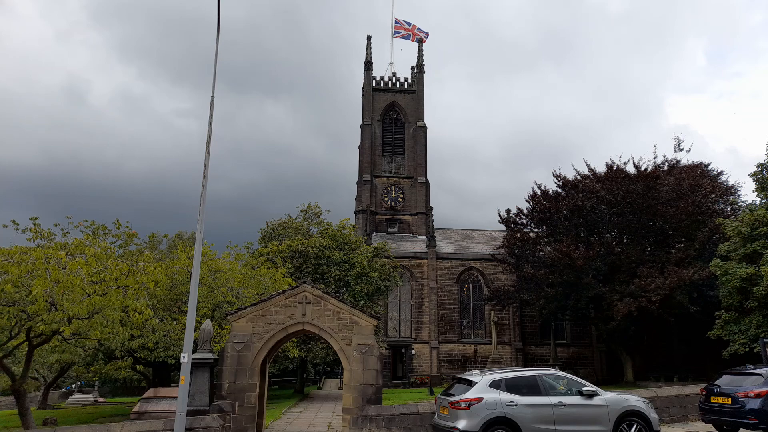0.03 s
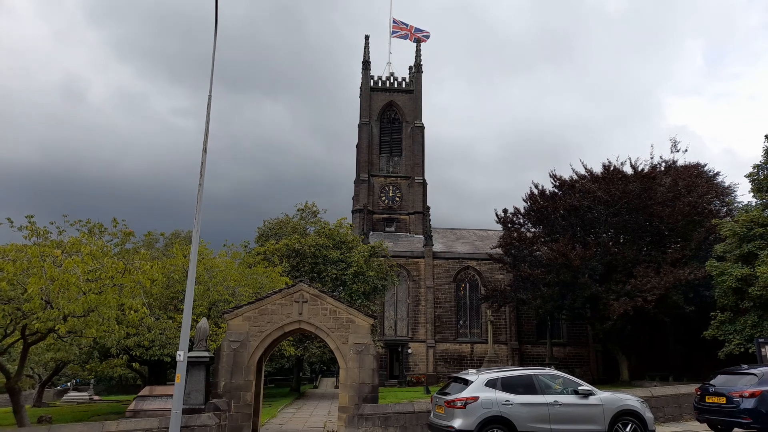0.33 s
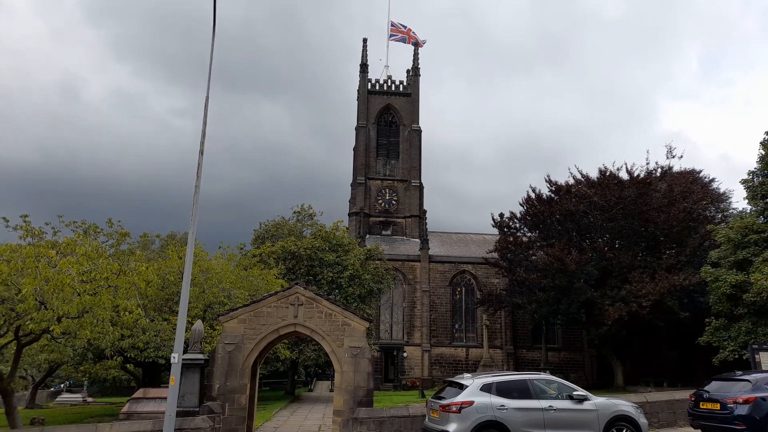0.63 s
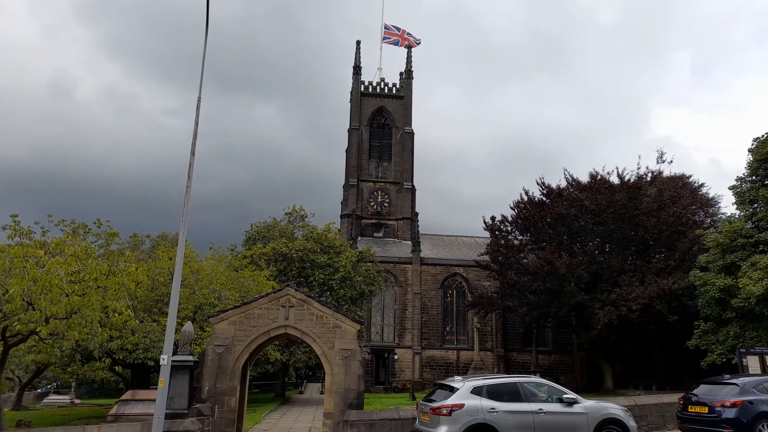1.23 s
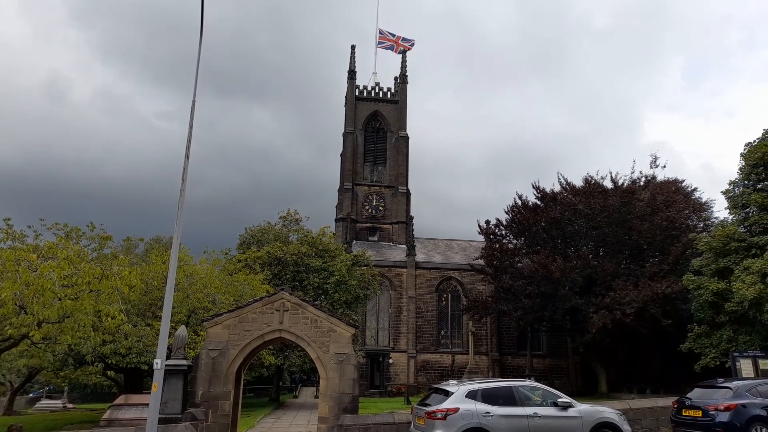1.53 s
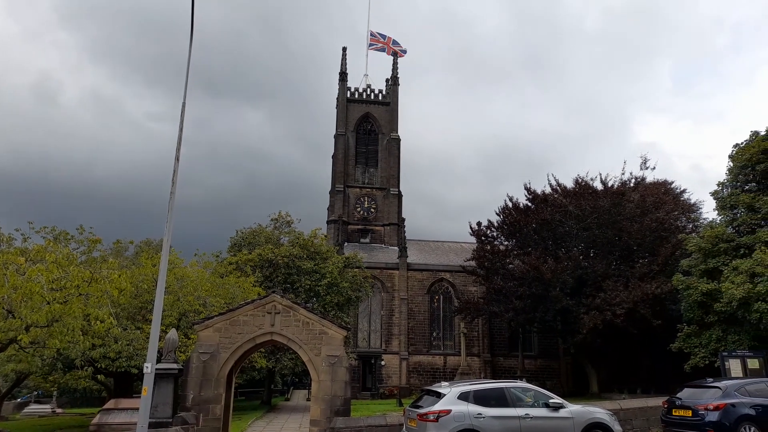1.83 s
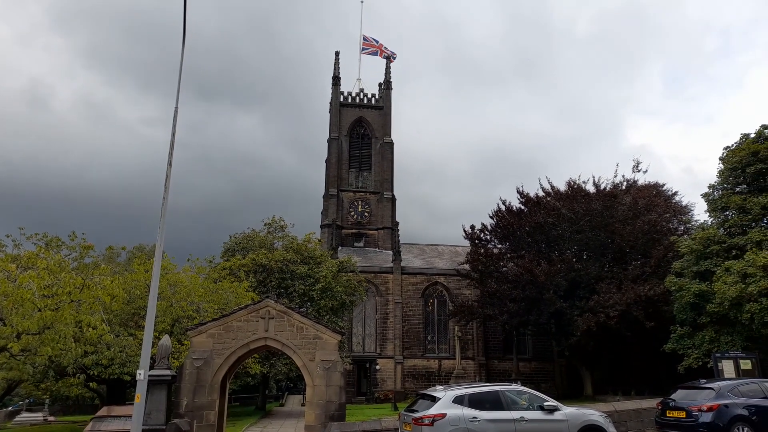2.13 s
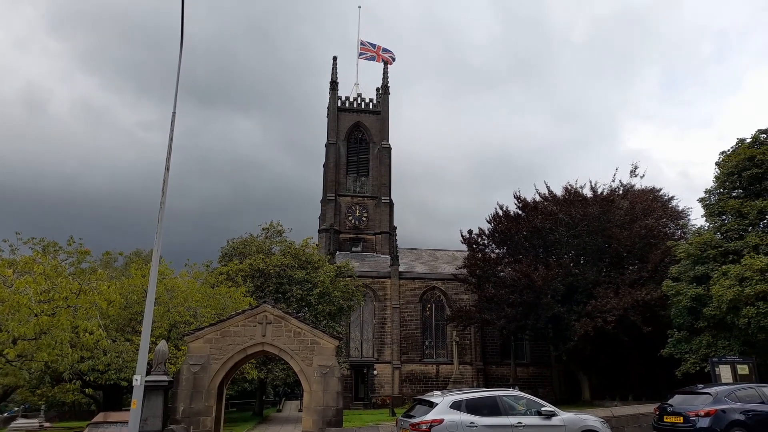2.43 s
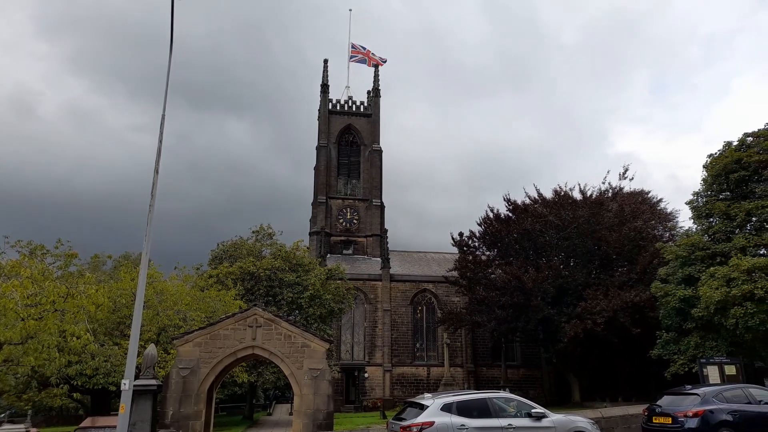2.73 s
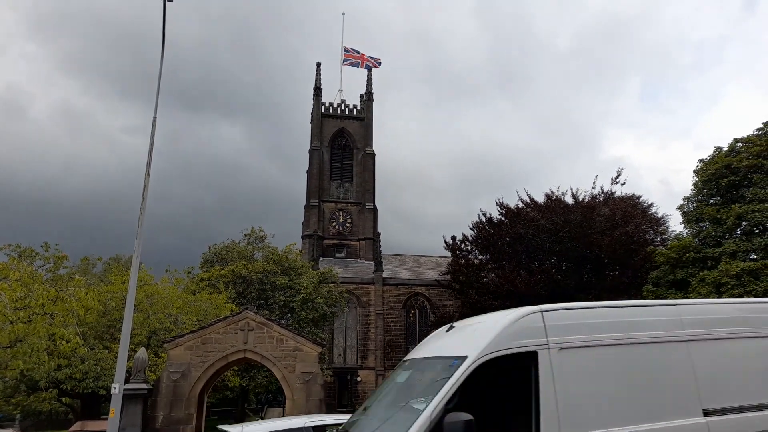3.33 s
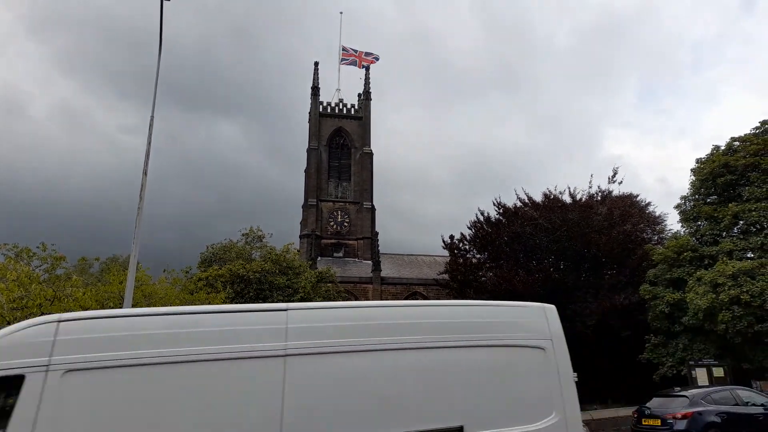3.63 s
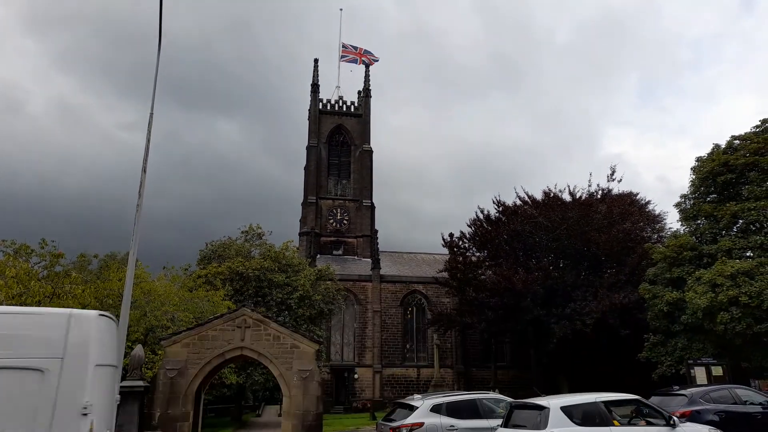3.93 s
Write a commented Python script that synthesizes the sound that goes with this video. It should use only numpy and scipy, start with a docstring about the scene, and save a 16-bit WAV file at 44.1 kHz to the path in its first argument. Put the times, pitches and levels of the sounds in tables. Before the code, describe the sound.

A diesel van passes close by, engine droning and tyres roaring, with distant town traffic behind.

```python
"""A diesel van drives past

The van goes from right to left, a few metres from a phone on the pavement of a town street.
Its engine drones and hisses, its tyres sing, and the front and rear axles roar by in turn.
Behind it are traffic up and down the road and one faint squeak. Wind buffets the phone's
two microphone openings (ports) separately."""
import sys
import numpy as np
from scipy import signal
from scipy.fft import rfft, irfft
from scipy.io import wavfile
from scipy.ndimage import uniform_filter1d, map_coordinates

SR = 44100
rng = np.random.default_rng(int(sys.argv[2]) if len(sys.argv) > 2 else 0)


def waveform_to_disk(signal):
    """Save audio, clipped to [-1, 1], as 16-bit WAV at the path in sys.argv[1]."""
    frames = np.transpose(np.atleast_2d(signal))
    scaled = np.clip(frames, -1, 1) * 32767
    samples = np.round(scaled).astype(np.int16)
    wavfile.write(sys.argv[1], SR, samples)


N = 176400

SPEED_M_S, LANE_M, SOUND_M_S = 8.2, 4.8, 343  # van speed, its closest distance, speed of sound
FRONT_S, REAR_S = 3.42, 3.8  # when each axle passes the phone
PORT_LAG_S = .00051  # time sound takes from one port to the other

# engine tones (multiple of the crankshaft's turning rate, level/dB)
ENGINE_TONES = [(2, -13.5), (3, -21), (4, -19), (6, -1.5), (7, -13), (8, -21.5), (9, -14), (12, -16.5)]
# loudness of the exhaust drone (t/s, level/dB)
DRONE_LOUDNESS = [(0, -26.5), (1.4, -12.5), (2.35, -15), (2.6, -5.5), (2.82, -5.5), (2.89, 1), (3.03, 3.5),
                  (3.3, -.7), (3.55, -2.7), (4, -10)]
# hiss from the front of the van (f/Hz, level/dB)
HISS_SPECTRUM = [(300, -14), (900, 10), (2000, 4.5), (3000, -2), (4500, -4), (7000, -7.5), (10000, -5),
                 (13300, -3.3), (15700, -8)]
# loudness of that hiss (t/s, level/dB)
HISS_LOUDNESS = [(0, -68), (1.85, -59.5), (2.05, -54.5), (2.35, -50.5), (2.66, -51.3), (2.82, -43.5),
                 (3.03, -39.3), (3.25, -38.2), (3.44, -37.7), (3.69, -39.7), (3.77, -44.5), (4, -51)]
# roar of the front tyres (f/Hz, level/dB)
FRONT_SPECTRUM = [(40, -10), (120, -1.5), (280, 4.8), (420, -10), (520, -12), (580, -5.5), (780, -2),
                  (1050, -8.5), (1270, -13), (1800, -18.5), (2800, -17.5), (7000, -40), (15000, -68)]
# roar of the rear tyres (f/Hz, level/dB)
REAR_SPECTRUM = [(40, -19), (110, -5), (245, 7.3), (380, -12), (600, -12), (850, .3), (1050, 0),
                 (1300, -10.5), (1850, -15), (2800, -39.5), (7000, -32), (10000, -25), (15000, -29)]
# narrow tread tones and broad tyre whooshes (f/Hz, width/Hz, level/dB, loudest at t/s, length/s)
TREAD_BANDS = [(505, 30, -40, 3.55, .48), (780, 70, -34.5, 3.95, .19), (762, 70, -35, 3.52, .13),
               (884, 40, -34.5, 3.64, .1), (870, 60, -36.5, 3.93, .22), (1450, 1200, -39.5, 3.02, .17),
               (1700, 700, -33.7, 3.42, .19), (1650, 480, -36.3, 3.77, .12)]
# distant traffic (f/Hz, level/dB)
TRAFFIC_SPECTRUM = [(25, -37), (55, -4.5), (150, -.8), (210, -1.3), (290, -3), (400, -4.5), (540, -5),
                    (680, -6.5), (850, -5.4), (1200, -7.4), (1750, -10.3), (2200, -16.5), (2800, -24),
                    (4300, -27), (7000, -44.5), (15000, -62)]
# loudness of that traffic (t/s, level/dB)
TRAFFIC_LOUDNESS = [(.14, -5), (.55, -2), (1.3, .5), (2.1, 1), (2.7, 2.5), (4, 4.5)]
# low rumble of the town (f/Hz, level/dB)
RUMBLE_SPECTRUM = [(20, -46), (36, -8), (54, 15), (72, 10.5), (110, -9), (250, -27)]
# thin swish on the left (f/Hz, level/dB)
SWISH_SPECTRUM = [(1500, -2.5), (4000, -1.7), (7000, -8.5), (8700, -4), (10000, -3), (13500, 3),
                  (14500, -1), (15200, -24)]
# loudness of that swish (t/s, level/dB)
SWISH_LOUDNESS = [(.14, -64), (.6, -57), (1.5, -54), (2.1, -47), (2.6, -53), (4, -59)]
# a gust hitting a port (f/Hz, level/dB)
GUST_SPECTRUM = [(20, -34), (45, -11), (70, -3), (135, 8), (200, -2.5), (290, -6.5), (370, -30.5),
                 (800, -41), (2500, -77)]
# the gusts (t/s, length/s, level/dB, port: 0 left or 1 right)
WIND_GUSTS = [(.29, .07, -32, 1), (.368, .04, -19, 1), (.47, .19, -25, 1), (.72, .15, -26, 1),
              (.79, .035, -20, 1), (.832, .035, -15, 1), (.91, .06, -21, 1), (1.148, .053, -24.5, 1),
              (1.585, .03, -22.5, 1), (2.377, .045, -25, 1), (2.89, .07, -23, 1), (3.476, .06, -18.5, 1),
              (3.775, .1, -24, 1), (.844, .13, -34, 0), (1.364, .1, -32, 0), (1.714, .06, -28, 0),
              (2.016, .056, -31, 0), (2.303, .12, -29.5, 0), (3.18, .06, -24.5, 0), (3.98, .07, -25, 0)]
# breeze blowing over a port (f/Hz, level/dB)
BREEZE_SPECTRUM = [(20, -24), (33, -14), (46, -1.5), (70, -0.5), (120, -0.5), (200, -18.5), (330, -24),
                   (1000, -57)]
# loudness of that breeze (t/s, level/dB)
BREEZE_LOUDNESS = [(.14, -39.5), (1, -38), (2.2, -37), (3.1, -37), (4, -35)]
# how the left port boosts or cuts each frequency (f/Hz, level/dB)
LEFT_COLOUR = [(300, 0.5), (600, 2.5), (1100, -1), (1700, -1.8), (2300, -3), (2900, -0.5), (6000, -1),
               (7400, -2), (8500, -4.5), (9800, -4), (15000, -8)]
# the same for the right port (f/Hz, level/dB)
RIGHT_COLOUR = [(300, 0.5), (600, 1.8), (1100, -.6), (1700, 2.6), (2300, 1.2), (2900, -2), (6000, 0),
                (7400, 0.5), (8500, -10.3), (9800, -1.2), (15000, -16.5)]


def engine(crank_hz=25.97, wander=.00399, drone_db=-28.5, hiss_pulse=.28, echo_db=4.5):
    """The exhaust drones at multiples of the crankshaft's rate; a hiss pulses with each firing."""
    distance, side = van_position(FRONT_S)
    crank_angle = 2 * np.pi * np.cumsum(crank_hz * (1 + wander * wobble(7.13))) / SR
    tones = 0
    for multiple, db in ENGINE_TONES:
        strength = np.sqrt(2) * gain(db + .5 * wobble(7.1))
        tones += strength * np.sin(round(multiple) * crank_angle + rng.uniform(0, 2 * np.pi))
    drone = travel(tones, distance) * gain(drone_db + curve(DRONE_LOUDNESS))
    firing = 1 + hiss_pulse * np.cos(2 * crank_angle)  # two firings per turn
    hiss = from_side(noise(HISS_SPECTRUM) * firing, side)
    hiss += gain(echo_db) * all_around(HISS_SPECTRUM)
    return from_side(drone, side) + hiss * gain(curve(HISS_LOUDNESS))


def axle_roar(passing_s, spectrum, db, flutter_db=1.6, bounce_db=-11, echo_db=-4.5):
    """Tyres roar and flutter on the road surface, growing louder as their axle comes near."""
    distance, side = van_position(passing_s)
    nearness = LANE_M / distance
    roar = travel(noise(spectrum) * gain(flutter_db * wobble(45)), distance)
    detour_m = .91 * nearness  # a bounce off the ground; its changing path sweeps the tone
    roar += gain(bounce_db) * delay(roar, detour_m / SOUND_M_S)
    house_echo = gain(echo_db) * all_around(spectrum)
    return gain(db) * nearness ** 2.1 * (from_side(roar, side) + house_echo)


def tyre_tread():
    """Narrow tread tones and broad whooshes swell and fade as the tyres pass the phone."""
    t, hz = np.arange(N) / SR, np.arange(N // 2 + 1) * SR / N
    sound = 0
    for centre, width, db, at, length in TREAD_BANDS:
        band_shape = 1 / (1 + ((hz - centre) / width) ** 2) ** 2
        band = irfft(rfft(rng.standard_normal(N)) * band_shape, N)
        swell = gain(db) / (1 + (2 * (t - at) / length) ** 2)
        sound += swell * band / band.std()
    distance, side = van_position((FRONT_S + REAR_S) / 2)
    return from_side(travel(sound, distance), side)


def wind(port):
    """Moving air buffets one port: short, low gusts over a restless breeze."""
    t = np.arange(N) / SR
    power = sum(gain(db) ** 2 * np.exp(-(2 * (t - at) / length) ** 2)
                for at, length, db, where in WIND_GUSTS if round(where) == port)
    gusts = noise(GUST_SPECTRUM) * np.sqrt(power)
    breeze = noise(BREEZE_SPECTRUM) * gain(curve(BREEZE_LOUDNESS) + 2 * wobble(6.12))
    return gusts + breeze


def traffic(cars_db=-41, echo_db=-39.5, rumble_db=-42.5):
    """Cars far up and down the road, their echo, the town's rumble and a thin swish on the left."""
    right = from_side(noise(TRAFFIC_SPECTRUM) * gain(cars_db + wobble(13)), .82)
    left = from_side(noise(TRAFFIC_SPECTRUM) * gain(cars_db + wobble(13)), -1.053)
    swish = np.array([noise(SWISH_SPECTRUM) * gain(curve(SWISH_LOUDNESS)), np.zeros(N)])
    echo = gain(echo_db) * all_around(TRAFFIC_SPECTRUM)
    rumble = gain(rumble_db) * all_around(RUMBLE_SPECTRUM)
    return (right + left + echo + rumble) * gain(curve(TRAFFIC_LOUDNESS)) + swish


def squeak(at_s=.513, hz=1110, length_s=.045, db=-50):
    """One faint, brief tone from somewhere down the street."""
    t = np.arange(N) / SR - at_s
    swell = gain(db) * np.sqrt(2) * np.exp(-(2 * t / length_s) ** 2)
    return swell * np.sin(2 * np.pi * hz * t)


def van_position(passing_s):
    """Distance in metres and side (-1 left, 1 right) of a point on the van."""
    along_road = SPEED_M_S * (passing_s - np.arange(N) / SR)
    distance = np.hypot(along_road, LANE_M)
    return distance, along_road / distance


def travel(x, distance):
    """Sound from further off arrives later, so a changing distance bends its pitch."""
    return delay(x, (distance - LANE_M) / SOUND_M_S)


def from_side(x, side):
    """Sound from the left (negative side) or right (positive) reaches the nearer port first."""
    lag_s = side * PORT_LAG_S / 2
    return np.array([delay(x, lag_s), delay(x, -lag_s)])


def all_around(spectrum):
    """Noise from every direction: alike at both ports in the bass, unrelated in the treble."""
    alike = np.sinc(2 * PORT_LAG_S * np.arange(N // 2 + 1) * SR / N)
    shared = irfft(rfft(noise(spectrum)) * np.sqrt((1 + alike) / 2), N)
    opposed = irfft(rfft(noise(spectrum)) * np.sqrt((1 - alike) / 2), N)
    return np.array([shared + opposed, shared - opposed])


def delay(x, seconds):
    """Make a sound late by a steady or changing time."""
    return map_coordinates(x, [np.arange(N) - seconds * SR], order=3, mode="mirror")


def noise(spectrum):
    """Noise of typical size 1; the spectrum sets only its balance of low and high."""
    x = colour(rng.standard_normal(N), spectrum)
    return x / x.std()


def colour(x, spectrum):
    """Boost or cut each frequency, following (f/Hz, level/dB) rows."""
    hz, db = np.array(spectrum).T
    log_hz = np.log(np.arange(N // 2 + 1) * SR / N + 1)
    return irfft(rfft(x) * gain(np.interp(log_hz, np.log(hz), db)), N)


def wobble(rate_hz):
    """A smooth random drift of typical size 1, with rate_hz new values a second."""
    hold = int(SR / rate_hz)
    steps = np.repeat(rng.standard_normal(N // hold + 1), hold)
    smooth = uniform_filter1d(uniform_filter1d(steps, hold), hold)[:N]
    return smooth / smooth.std()


def curve(rows):
    """Join (t/s, level/dB) rows with straight lines."""
    return np.interp(np.arange(N) / SR, *np.array(rows).T)


def gain(db):
    """Turn decibels into a multiplier."""
    return 10 ** (np.asarray(db) / 20)


def scene():
    """The van, the street and the wind, as left and right channels."""
    van = engine() + tyre_tread()
    van += axle_roar(FRONT_S, FRONT_SPECTRUM, db=-31.3)
    van += axle_roar(REAR_S, REAR_SPECTRUM, db=-31.2)
    return van + traffic() + squeak() + np.array([wind(0), wind(1)])


def record(dry):
    """Each port colours the sound, which starts abruptly and loses its highest treble."""
    start_s, rise_s, top_hz = .136, .0071, 15700
    opening = gain(curve([(0, -70), (start_s - rise_s, -42), (start_s + rise_s / 2, 0)]))
    heard = np.array([colour(dry[0], LEFT_COLOUR), colour(dry[1], RIGHT_COLOUR)]) * opening
    treble_cut = signal.ellip(10, .2, 80, top_hz, fs=SR, output="sos")
    return signal.sosfilt(treble_cut, heard)


dry = scene()
out = record(dry)
waveform_to_disk(out)
```